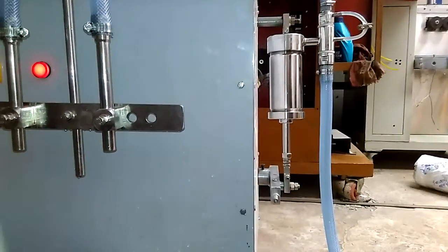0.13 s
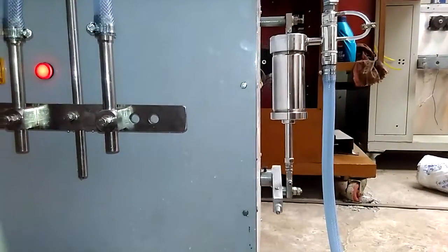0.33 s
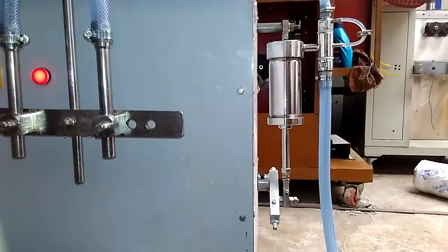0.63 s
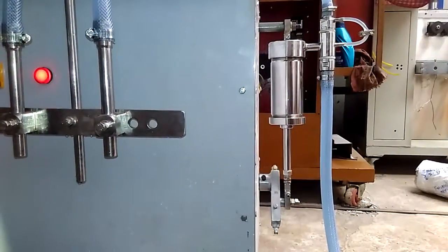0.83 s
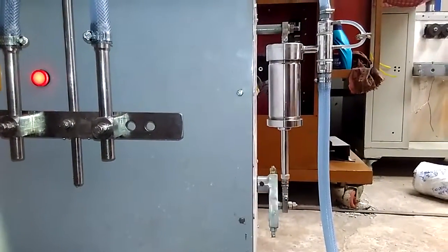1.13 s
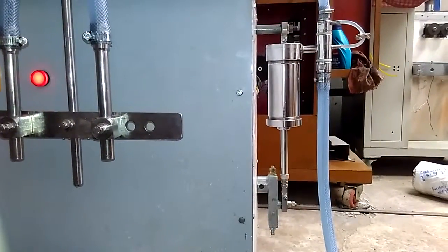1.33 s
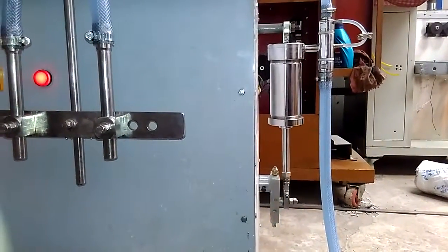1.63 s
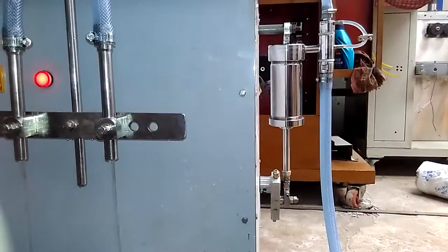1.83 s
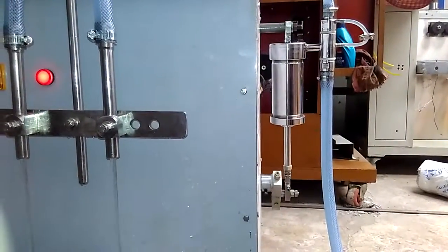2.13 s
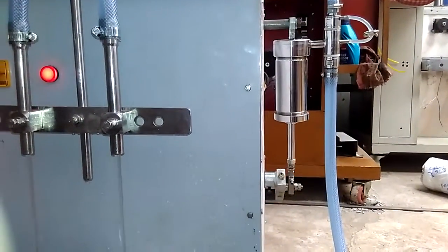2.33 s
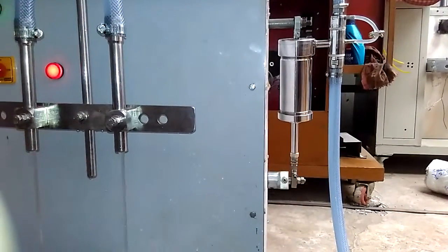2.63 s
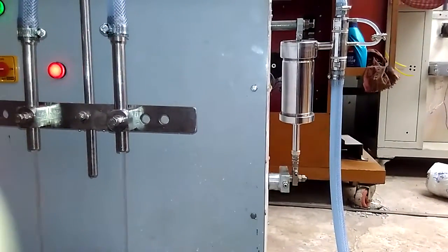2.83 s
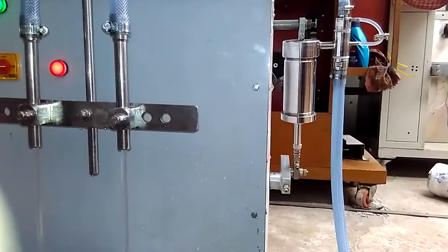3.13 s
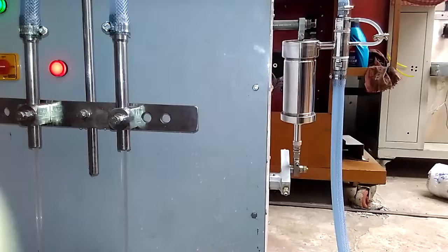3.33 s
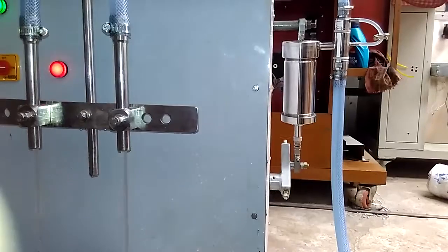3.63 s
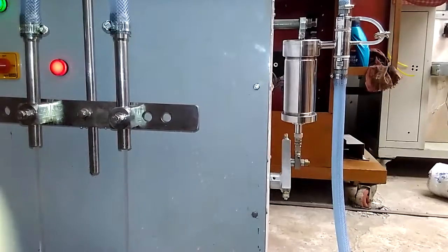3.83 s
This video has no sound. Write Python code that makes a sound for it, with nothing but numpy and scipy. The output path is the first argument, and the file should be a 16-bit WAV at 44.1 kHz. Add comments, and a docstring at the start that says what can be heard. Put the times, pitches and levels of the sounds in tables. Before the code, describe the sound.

Liquid jets splatter into a container with a loud hiss after a quiet machine hum.

```python
"""Piston filler in a workshop

A filling machine hums, ticks and leaks a little air. Two nozzles open: slugs of liquid slap into a
container and excite its resonances, then the jets splatter steadily, trapped bubbles ring, and the
piston reverses with a clunk. The microphone's left port resonates in the high treble, its right
port is inverted, and gain control ducks the hum along with everything else when the sound is loud."""
import sys
import numpy as np
from scipy import signal
from scipy.fft import rfft, irfft, next_fast_len
from scipy.io import wavfile
from scipy.ndimage import uniform_filter1d, map_coordinates

SR = 44100
rng = np.random.default_rng(int(sys.argv[2]) if len(sys.argv) > 2 else 0)


def persist_wave(psi):
    """Save psi, clipped to +-1, as 16-bit WAV."""
    counts = np.round(np.clip(psi, -1, 1) * 32767).astype(np.int16)
    wavfile.write(sys.argv[1], SR, np.atleast_2d(counts).T)


N = 176400

# partials of the motor, casing and drive (frequency [Hz], relative level [dB])
HUM_PARTIALS = [(71, -47.5), (100, -34.5), (139, -54.5), (207, -51)]
BUZZ_PARTIALS = [(279, -50.5), (299.7, -37.5), (323, -42.5)]
WHIRR_PARTIALS = [(549, -47.5), (764, -51.5), (840, -51), (872, -52.5), (905, -55.5)]
# envelopes of those three sets of partials (time [s], gain [dB])
MOTOR_LOAD = [(0, -3), (.8, 0), (1.3, 0), (1.67, 7.5), (1.9, 8), (2.1, 0), (3, 2.5), (4, 5.5)]
BUZZ_GAIN = [(0, -6.5), (.6, -1.5), (1.15, -1), (1.6, -10.5), (4, -2)]
WHIRR_GAIN = [(0, 1.5), (.9, -5), (1.4, 4.5), (1.8, 0), (4, 8)]
# envelopes of the sustained noises (time [s], level [dB])
RUMBLE_LEVEL = [(0, -35), (.6, -34.5), (1.95, -34), (2.15, -36), (2.8, -37.5), (4, -38)]
LEAK_LEVEL = [(0, -53), (.7, -51.5), (1.3, -51), (1.6, -46), (1.95, -43), (4, -38)]
JET_LEVEL = [(1.58, -77.5), (1.7, -47), (1.95, -45), (4, -68)]
SPRAY_LEVEL = [(1.955, -86), (1.975, -36), (2.03, -36), (2.05, -11.5), (2.12, -28.5), (2.19, -22),
               (2.35, -15.5), (2.362, -30), (2.395, -19), (2.44, -14), (2.55, -14), (2.9, -12),
               (3.42, -13.5), (3.48, -14.5), (3.65, -13.5), (3.9, -16.5), (4, -16)]  # fine spray where the jets land
PATTER_LEVEL = [(2.0, -43.5), (2.05, -26.5), (2.2, -20), (2.33, -27.5), (2.6, -23.5), (2.8, -25),
                (3.25, -23), (3.45, -22.5), (3.7, -25), (4, -34)]  # heavier drops drumming in the container
GURGLE_LEVEL = [(2.3, -65), (2.8, -39), (3.0, -22.5), (3.25, -32), (3.5, -24.5), (3.7, -31), (4, -27.5)]
# spectral shapes of the noise sources (frequency [Hz], relative density [dB])
RUMBLE_SPECTRUM = [(25, -16), (70, 2), (105, 1.5), (175, -11.5), (230, -10), (290, 0), (355, -1.5),
                   (530, -3.5), (860, -9.5), (1100, -16.5), (1600, -17), (2600, -25.5), (3600, -32.5),
                   (7000, -33), (14000, -57)]
LEAK_SPECTRUM = [(2500, 1), (4800, -11.5), (5500, -2.5), (6300, -4.5), (8000, 6), (9000, 4.5), (10000, -4),
                 (11000, -0.5), (12000, -3), (14000, -9.5)]
TICK_SPECTRUM = [(300, -20), (900, -9), (1300, 6), (1700, 1), (2100, -40), (6000, -35)]
JET_SPECTRUM = [(1200, -8), (2600, 0), (4000, -30), (4800, -5), (5400, 5.5), (6200, -9), (8000, 3.5),
                (14000, -26)]
SLAP_SPECTRUM = [(600, -28), (1500, -5.5), (2800, -1.5), (3800, 6), (5500, -9.5)]  # how a slug drives the container
SPRAY_SPECTRUM = [(200, -29), (1500, -27.5), (3400, -17), (4000, -9), (5300, -4.5), (6300, 0), (8500, 2.5),
                  (10000, 0), (12000, 0), (14000, -3.5)]
GURGLE_SPECTRUM = [(25, -29), (70, 6), (140, -3.5), (180, -5), (250, -1.5), (400, -14.5), (700, -4.5),
                   (1000, -11.5), (2000, -28.5)]
CLUNK_SPECTRUM = [(40, -12), (130, -24), (245, 7.5), (370, -6.5), (560, -2.5), (900, -15), (1600, -14.5),
                  (3500, -28), (9000, -53)]
# slugs of liquid landing (time [s], duration [s], spray level [dB], container level [dB])
SLAPS = [(1.883, 0.0081, -41, -53), (1.969, 0.0031, -34, -40), (2.038, 0.0024, -14, -21.5),
         (2.053, 0.0033, -25, -14), (2.063, 0.0078, -7, -13.5), (2.082, 0.0016, -27, -9),
         (2.132, 0.0015, -5.5, -32), (2.141, 0.0038, -3.5, -20), (2.155, 0.0047, 2, -12),
         (2.167, .006, -23, -14.5), (2.186, 0.0048, -6, -23), (2.221, 0.011, -7.5, -10.5),
         (2.37, 0.0036, -3, -18), (2.413, 0.005, -5, -29), (2.464, 0.015, -11.5, -23.5),
         (2.574, 0.013, -18, -13), (2.602, 0.0015, -6, -5.5), (2.628, 0.0068, -10, -13.5),
         (2.819, 0.0059, -7, -34), (2.861, 0.0029, -25, -13.5), (3.05, 0.0058, -13, -17),
         (3.268, 0.04, -11, -26.5), (3.396, 0.005, -3, -14), (3.431, 0.012, -13, -14.5),
         (3.501, 0.0031, -8, -13.5), (3.616, 0.011, -8.5, -21), (3.801, .002, -11, -23),
         (3.848, 0.0011, -12, -45), (3.887, 0.011, -11, -25.5)]
# container resonances (frequency [Hz], bandwidth [Hz], gain [dB], left over right [dB])
CONTAINER_MODES = [(670, 1190, -0.5, -3.5), (1067, 64, 1, 0.5), (1508, 70, 5, 1), (1615, 135, -2, -4),
                   (1950, 126, -4, 5), (2370, 165, -2, 1), (2975, 106, 5, -2.5), (3157, 48, 2.5, -3),
                   (3677, 107, 2.5, 5.5), (3980, 130, 2.5, 3), (4395, 160, 1, -1), (4610, 144, -5.5, 20),
                   (5330, 120, -3, -14)]
# container antiresonances (frequency [Hz], bandwidth [Hz])
CONTAINER_NULLS = [(2690, 115), (3450, 120)]
# loud, distinct bubble plinks (time [s], starting frequency [Hz], level [dB])
LOUD_BUBBLES = [(2.025, 1700, -12.5), (2.045, 1780, -15), (2.109, 1710, -7.5), (2.223, 3160, 0),
                (2.231, 3850, -0.5), (2.375, 3660, -1), (3.07, 1540, -23), (3.213, 1220, -13.5)]
# valve impacts as the piston reverses (time [s], level [dB])
CLUNKS = [(3.363, -9), (3.386, -16), (3.408, -12)]
# likeness of the left and right noise (frequency [Hz], correlation [-1..1])
CORRELATION = [(100, 0.93), (400, 0.97), (850, 0.55), (1150, 0.35), (1700, -0.15), (3000, -0.015)]
# responses of the microphone ports (frequency [Hz], gain [dB])
LEFT_PORT = [(150, 2), (400, -1.5), (950, 4), (1500, 1), (3000, 2.5), (4000, 3.5), (6000, 3), (8000, 4.5),
             (9000, 10), (9600, 16), (10050, 21), (10500, 16), (11200, 11), (14000, 5.5)]
RIGHT_PORT = [(150, 2.5), (400, -4.5), (950, -1), (1500, 1.5), (3000, 3.5), (4000, 2), (6000, 2),
              (8600, -2), (10000, -3.5), (14000, -8)]

TOP_HZ = 14300  # upper band limit


def amp(db):
    """Amplitude ratio: a factor of ten per 20 dB."""
    return 10 ** (np.asarray(db) / 20)


def unit(x):
    """Normalisation to rms 1."""
    return x / np.sqrt(np.mean(x ** 2) + 1e-20)


def along(points, hz):
    """Interpolation of (frequency [Hz], value) points on a logarithmic axis."""
    knots_hz, values = np.transpose(points)
    return np.interp(np.log(hz + 1), np.log(knots_hz + 1), values)


def clock():
    """Uniform sampling: the time of each sample in seconds."""
    return np.arange(N) / SR


def level(points):
    """Amplitude envelope from (time [s], level [dB]) points; silent until 50 ms before the first."""
    times, db = np.transpose(points)
    return amp(np.interp(clock(), times, db)) * (clock() >= times[0] - .05)


def wobble(rate):
    """Smooth random modulation: a spline through rate Gaussian knots a second."""
    return map_coordinates(rng.standard_normal(4096), [clock() * rate], mode="wrap")


def pan(db):
    """Interchannel level difference: gains that favour the left by db."""
    return amp([[db / 2], [-db / 2]])


def filtered(x, response):
    """Linear filtering: the spectrum of x times a complex frequency response."""
    size = next_fast_len(N + SR // 2)
    return irfft(rfft(x, size) * response(np.fft.rfftfreq(size, 1 / SR)), size)[..., :N]


def colour(points):
    """Minimum-phase response for (frequency [Hz], gain [dB]) points, by folding the cepstrum."""
    def response(hz):
        cepstrum = irfft(np.log(amp(along(points, hz))))
        half = len(cepstrum) // 2
        fold = np.r_[1, np.full(half - 1, 2), 1, np.zeros(half - 1)]
        return np.exp(rfft(cepstrum * fold))
    return response


def excite(envelope, response):
    """Source and filter: partly correlated stereo noise, enveloped, drives a unit-power response."""
    def mid_side(hz):
        angle = np.arccos(np.clip(along(CORRELATION, hz), -.995, .995)) / 2
        return np.array([np.cos(angle), np.sin(angle)])

    def normalised(hz):
        gain = response(hz)
        return gain / np.sqrt(np.mean(abs(gain) ** 2))
    mid, side = filtered(envelope * rng.standard_normal((2, N)), mid_side)
    return filtered(np.array([mid + side, mid - side]), normalised)


def burst(start, hold, rise, t60):
    """Transient envelope: an attack, then exponential decay after the hold; times in seconds."""
    age = np.maximum(clock() - start, 0)
    return (1 - np.exp(-age / rise)) * amp(-60 * np.maximum(age - hold, 0) / t60)


def smooth(x, seconds):
    """Exponential averaging by a one-pole lag."""
    pole = np.exp(-1 / (seconds * SR))
    return signal.lfilter([1 - pole], [1, -pole], x)


def churn(x, depth_db, patch):
    """Spectral modulation favours now one pitch, now another, in patches of (bands, frames)."""
    spectra = signal.stft(x, nperseg=512)[2]
    field = rng.standard_normal(spectra.shape[1:])
    field = uniform_filter1d(uniform_filter1d(field, patch[0], 0), patch[1], 1)
    return signal.istft(spectra * unit(amp(depth_db * unit(field))), nperseg=512)[1][:, :N]


def tones(partials, flutter_db):
    """Superposition of sinusoids, each slightly unsteady in amplitude and phase."""
    out = np.zeros(N)
    for hz, db in partials:
        peak = np.sqrt(2) * amp(db + flutter_db * wobble(16))
        out += peak * np.sin(2 * np.pi * hz * clock() + 0.12 * wobble(8.57) + 2 * np.pi * rng.random())
    return out


def machine():
    """Forced vibration: mains hum swells with motor load over casing buzz, drive whirr and rumble."""
    hum = level(MOTOR_LOAD) * tones(HUM_PARTIALS, flutter_db=3.0)
    buzz = level(BUZZ_GAIN) * tones(BUZZ_PARTIALS, flutter_db=4.6)
    whirr = level(WHIRR_GAIN) * tones(WHIRR_PARTIALS, flutter_db=2.0)
    rumble = excite(level(RUMBLE_LEVEL) * amp(0.16 * wobble(13.45)), colour(RUMBLE_SPECTRUM))
    return (hum + buzz + whirr) * pan(1.0) + churn(rumble, depth_db=2.5, patch=(2, 8))


def air_leak():
    """Turbulence in escaping air radiates a growing hiss, stronger on the left."""
    return excite(level(LEAK_LEVEL) * amp(0.4 * wobble(9.3)), colour(LEAK_SPECTRUM)) * pan(7)


def linkage_tick(start_s=.6815, db=-26):
    """Impulsive excitation: a light tick of the linkage with a faint, slower decay."""
    strike = burst(start_s, hold=.002, rise=0.00037, t60=0.011)
    tail = amp(-13) * burst(start_s, hold=0, rise=0.0052, t60=0.31)
    return excite(amp(db) * (strike + tail), colour(TICK_SPECTRUM))


def jets():
    """Flow noise: liquid hisses out of the nozzles."""
    return excite(level(JET_LEVEL), colour(JET_SPECTRUM))


def drops(per_s, scatter_db, life_s, clump_db, clump_rate):
    """Shot noise: the rms-1 envelope of many tiny impacts of random size, swelling in clumps."""
    hits = (rng.random(N) < per_s / SR) * amp(scatter_db * np.minimum(rng.standard_normal(N), 2))
    energy = abs(smooth(hits ** 2, life_s))
    return unit(np.sqrt(energy) * amp(clump_db * wobble(clump_rate)))


def resonance(hz, centre, width):
    """Band-pass response of a damped oscillator, unity at its centre frequency."""
    return 1j * hz * width / (centre ** 2 - hz ** 2 + 1j * hz * width)


def container(hz):
    """Modal superposition: the resonances of the vessel being filled, as each side hears them."""
    return sum(pan(left_db) * amp(db) * resonance(hz, centre, width)
               for centre, width, db, left_db in CONTAINER_MODES)


def container_nulls(hz, depth_db=-6):
    """Destructive interference: narrow dips where the container's reflections cancel."""
    dips = [1 - (1 - amp(depth_db)) * resonance(hz, centre, width) for centre, width in CONTAINER_NULLS]
    return np.prod(dips, axis=0)


def splatter():
    """Impact noise: slugs and drops throw spray and ring the container; the moving surface tints both."""
    crackle = drops(per_s=2200, scatter_db=1.5, life_s=0.00051, clump_db=1.5, clump_rate=430)
    slap_spray, slap_body = np.zeros((2, N))
    for start, hold, spray_db, body_db in SLAPS:
        slap = crackle * burst(start, hold, rise=0.0019, t60=0.015)
        slap_spray += amp(spray_db) * slap
        slap_body += amp(body_db) * slap
    fine = drops(per_s=5500, scatter_db=2.0, life_s=0.00049, clump_db=0.36, clump_rate=330)
    fine *= level(SPRAY_LEVEL) * amp(0.48 * wobble(21.57))
    heavy = drops(per_s=2300, scatter_db=4.5, life_s=0.00069, clump_db=1.5, clump_rate=29)
    spray = excite(np.hypot(fine, slap_spray), colour(SPRAY_SPECTRUM))  # incoherent powers add
    spray = churn(spray, depth_db=2.4, patch=(14, 3))
    patter = excite(level(PATTER_LEVEL) * heavy, container)
    slugs = excite(slap_body, lambda hz: container(hz) * colour(SLAP_SPECTRUM)(hz))
    return spray + churn(patter + slugs, depth_db=5.0, patch=(4, 4))


def droplets(count, centre_hz=5930, t60_cycles=33):
    """Damped sinusoids: single droplets tick out of the spray, each with its own pitch, size and side."""
    when, size, side, phase = rng.random((count, 4)).T[:, :, None]
    hz = np.minimum(centre_hz * np.exp(0.38 * rng.standard_normal((count, 1))), TOP_HZ)
    first = SPRAY_LEVEL[0][0] * SR
    start = (first + when * (N - 1 - first)).astype(int)
    steps = np.arange(SR // 100)
    cycles = hz * steps / SR
    db = -6.5 + 3 * np.minimum(-np.log(1 - size), 3)  # relative to the spray
    envelope = level(SPRAY_LEVEL)[start] * amp(db - 60 * cycles / t60_cycles) * (1 - np.exp(-cycles))
    ticks = envelope * np.sin(2 * np.pi * (cycles + phase))
    return np.array([np.bincount((start + steps).ravel(), (np.sqrt(share) * ticks).ravel(), N)[:N]
                     for share in (side, 1 - side)])


def bubbles(count, from_s=2.35, to_s=3.7, centre_hz=1254, t60_cycles=55.4, pitch_rise=0.38):
    """Bubble resonance: a few loud plinks and many faint, lower ones ring unevenly, rising in pitch."""
    faint = [(from_s + when * (to_s - from_s), centre_hz * np.exp(0.433 * (2 * pitch - 1)),
              -33 + 10 * strength) for when, pitch, strength in rng.random((count, 3))]
    out = np.zeros((2, N + SR))
    t = np.arange(SR // 10) / SR
    for start, hz, db in list(LOUD_BUBBLES) + faint:
        cycles = hz * t
        age = cycles / t60_cycles
        # the phase takes a random walk of 0.36 rad per cycle
        waver = 0.36 * np.sqrt(hz / SR) * np.cumsum(rng.standard_normal((2, len(t))), axis=1)
        phase = 2 * np.pi * (cycles * (1 + pitch_rise * age / 2) + rng.random((2, 1))) + waver
        envelope = amp(db - 60 * age) * (1 - np.exp(-cycles / 1.4))
        out[:, round(start * SR):][:, :len(t)] += envelope * np.sin(phase)
    return out[:, :N]


def gurgle():
    """Modulated low-frequency noise, probably liquid pushed through the cylinder and hoses."""
    flow = excite(level(GURGLE_LEVEL) * amp(1.4 * wobble(9.9)), colour(GURGLE_SPECTRUM))
    return churn(flow, depth_db=2, patch=(2, 6))


def valve_clunk():
    """Impact and free decay: the valve rattles as the piston reverses, and the cabinet booms."""
    rattle = sum(amp(db) * burst(start, hold=0.0031, rise=0.0013, t60=0.055) for start, db in CLUNKS)
    first_s, first_db = CLUNKS[0]
    boom = amp(first_db - 1) * burst(first_s, hold=0, rise=0.0095, t60=0.5)
    return excite(np.hypot(rattle, boom), colour(CLUNK_SPECTRUM))


def workshop(x, segments=16, t60_s=0.27):
    """Diffuse reverberation from the walls: each segment of x meets its own decaying noise tail."""
    t = np.arange(SR // 2) / SR
    out = np.zeros((2, N + len(t)))
    for part in np.array_split(np.arange(N), segments):
        tail = rng.standard_normal((2, len(t))) * amp(-60 * t / t60_s) * (1 - np.exp(-t / 0.0013))
        echo = signal.fftconvolve(x[:, part], tail / np.linalg.norm(tail[0]), axes=1)
        out[:, part[0]:][:, :echo.shape[1]] += echo
    return out[:, :N]


def scene():
    """Superposition of machine and liquid; only the poured liquid reverberates."""
    liquid = filtered(splatter() + jets() + droplets(count=420) + bubbles(count=70), container_nulls)
    filler = machine() + air_leak() + linkage_tick() + valve_clunk() + gurgle()
    return filler + liquid + amp(-4.5) * workshop(liquid)


def record(dry, threshold_db=-26.5, max_cut_db=10, reaction_s=0.047):
    """Transduction: port responses with the right inverted, gain control, clipping and a band limit."""
    ports = filtered(dry, lambda hz: np.array([colour(LEFT_PORT)(hz), -colour(RIGHT_PORT)(hz)]))
    power = abs(smooth(np.mean(ports ** 2, axis=0), reaction_s))
    excess_db = 10 * np.log10(power + 1e-12) - threshold_db
    duck_db = smooth(np.clip(excess_db, 0, max_cut_db), reaction_s / 2)
    clipped = np.clip(ports * amp(-duck_db), -1, 1)
    return filtered(clipped, lambda hz: hz < TOP_HZ)


dry = scene()
out = record(dry)
persist_wave(out)
```